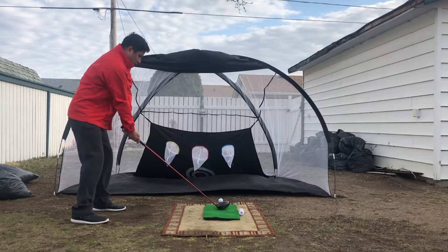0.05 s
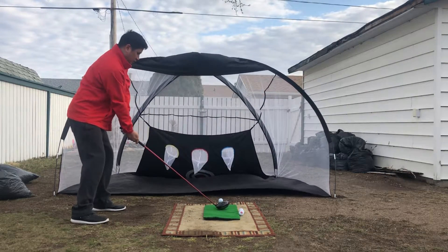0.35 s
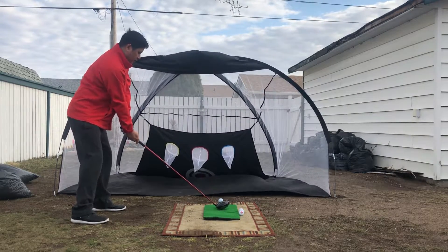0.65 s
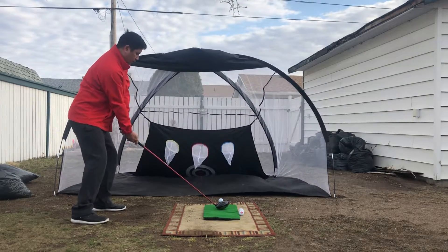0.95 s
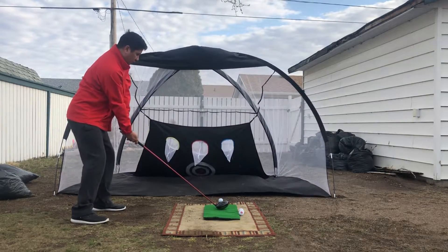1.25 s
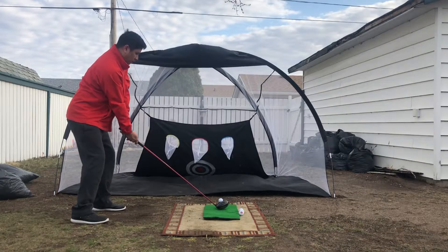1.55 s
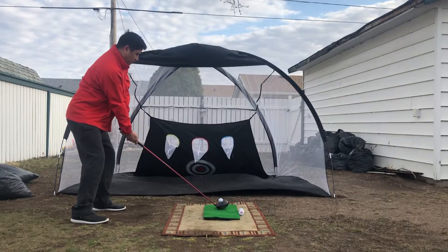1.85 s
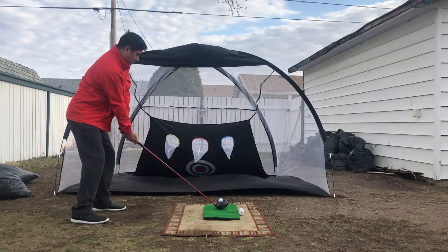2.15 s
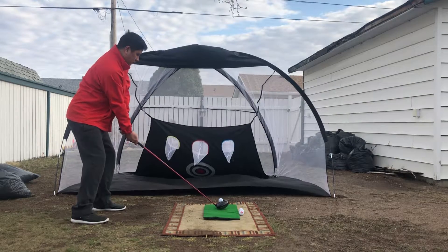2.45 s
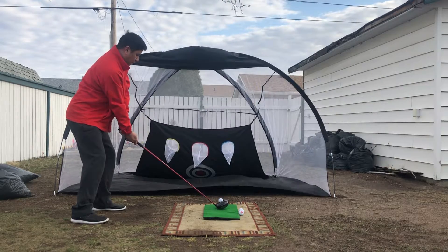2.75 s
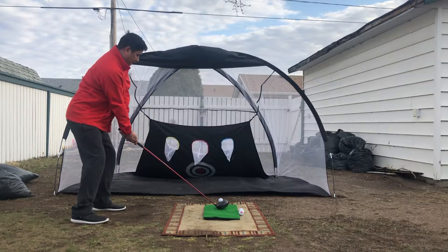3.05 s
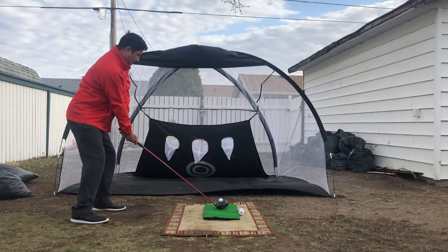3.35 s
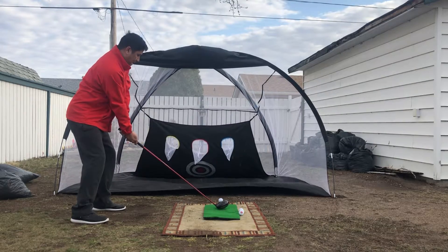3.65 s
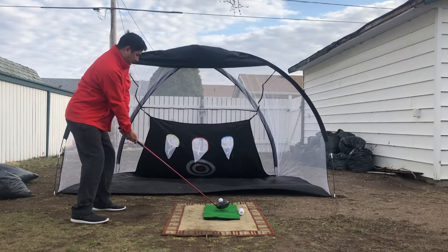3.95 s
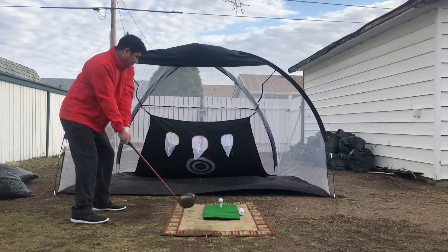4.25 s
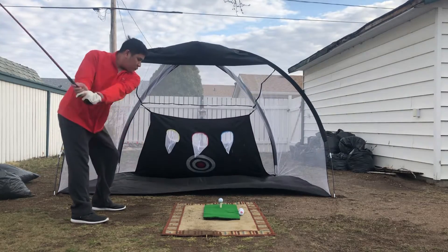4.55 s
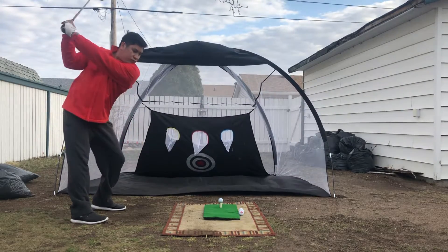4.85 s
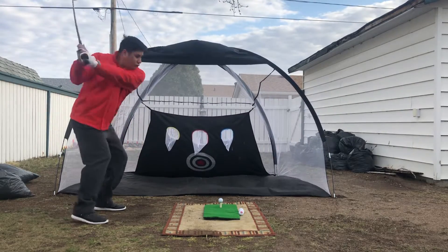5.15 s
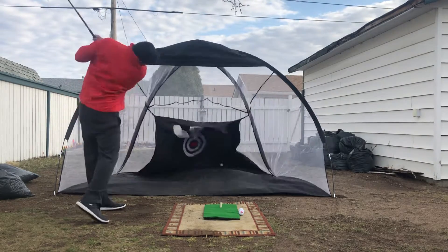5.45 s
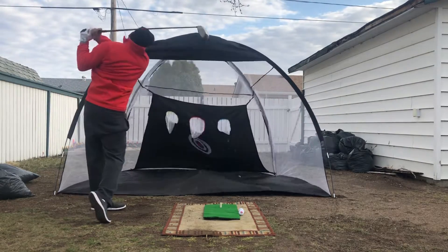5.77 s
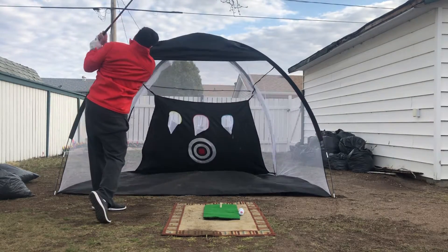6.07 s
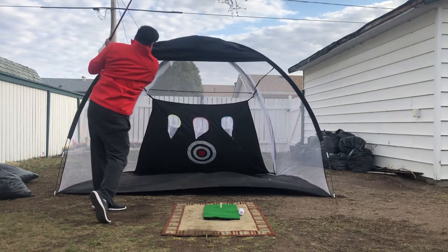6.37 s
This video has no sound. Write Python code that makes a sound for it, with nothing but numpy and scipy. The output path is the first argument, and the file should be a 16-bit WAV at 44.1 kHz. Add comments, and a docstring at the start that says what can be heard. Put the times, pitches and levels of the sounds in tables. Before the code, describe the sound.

Light wind rumbles on the microphone in a quiet backyard, then a golf club swishes and cracks a ball into a flapping practice net.

```python
"""Light wind buffets the microphone in a quiet backyard, over a distant hush and small sounds of a golfer.
He drives a ball into a practice net: the shaft swishes by vortex shedding, the impact cracks and sets
the hollow metal head ringing in its modes, and a fence and a garage reflect the sound. The ball slaps
the target sheet, which flaps and drums while the netting rustles. A limiter ducks under the blows."""
import sys
import numpy as np
from scipy import signal
from scipy.fft import rfft, irfft, next_fast_len
from scipy.io import wavfile
from scipy.ndimage import uniform_filter1d, minimum_filter1d

SR = 44100
rng = np.random.default_rng(int(sys.argv[2]) if len(sys.argv) > 2 else 0)


def log_audio(samples):
    """Write samples as a 16-bit WAV file to the path given in sys.argv[1]."""
    # one column per channel
    frames = np.atleast_2d(samples).T
    # limit to full scale, then quantise
    limited = np.clip(frames, -1, 1)
    pcm = np.round(limited * 32767).astype(np.int16)
    wavfile.write(sys.argv[1], SR, pcm)


N = 291501
TIME = np.arange(N) / SR
STRIKE_S = 5.3721


def from_db(db):
    return 10 ** (np.asarray(db) / 20)


def rms_one(x):
    return x / np.sqrt(np.mean(x ** 2) + 1e-20)


def in_time(rows):
    """Each column of a curve, joined by straight lines."""
    s, *columns = np.transpose(rows)
    return [np.interp(TIME, s, c) for c in columns]


def since(s):
    """Seconds since an event, zero before it."""
    return np.maximum(TIME - s, 0)


def add(out, s, sound):
    """Mix a short sound in at a time."""
    at = max(int(s * SR), 0)
    out[at:at + len(sound)] += sound[:N - at]


def cut(x, hz, kind, order=2):
    """Butterworth low- or high-pass."""
    return signal.sosfilt(signal.butter(order, min(hz, .45 * SR), kind, fs=SR, output="sos"), x)


def drift(rate):
    """Slow chance with spread 1."""
    r = np.exp(-40 * np.pi * rate / SR)
    slow = signal.lfilter([1], [1, -2 * r, r * r], rng.standard_normal(N // 20 + 2002))[2000:]
    return np.interp(np.arange(N) / 20, np.arange(len(slow)), rms_one(slow))


def coloured(spectrum, source=None):
    """Noise (or a given source) with a smooth spectrum and steep ends; rms 1."""
    hz, db = np.transpose(spectrum)
    size = next_fast_len(N)
    f = np.maximum(np.fft.rfftfreq(size, 1 / SR), 1)
    ends = 1 / np.sqrt((1 + (hz[0] / f) ** 8) * (1 + (f / hz[-1]) ** 8))
    source = rng.standard_normal(N) if source is None else source
    return rms_one(irfft(rfft(source, size) * ends * from_db(np.interp(np.log(f), np.log(hz), db)),
                         size)[:N])


def narrow_noise(hz, width_hz):
    """A wavering tone around a pitch, which may move; rms 1."""
    phase = 2 * np.pi * np.cumsum(hz * np.ones(N)) / SR
    return drift(width_hz) * np.cos(phase) + drift(width_hz) * np.sin(phase)


def swells(rows, rest_db):
    """Incoherent addition: bell-shaped swells and a resting level sum in power to give one gain."""
    power = sum((from_db(db) * np.exp(-np.minimum(np.abs(TIME - s) / half, 10) ** 2)) ** 2
                for s, db, half in rows)
    return np.sqrt(power + from_db(rest_db) ** 2)


def burst(s, length_s, order, rise_s=0.00035):
    """Transient envelope: a sharp attack, then a decay that ends more abruptly at higher order."""
    age = since(s)
    return (1 - np.exp(-age / rise_s)) * np.exp(-np.minimum(age / length_s, 4) ** order)


def resonate(x, hz, width_hz):
    """Resonance: a damped oscillator passes a band around its natural frequency; rms 1."""
    r = np.exp(-np.pi * width_hz / SR)
    return rms_one(signal.lfilter([1, 0, -1], [1, -2 * r * np.cos(2 * np.pi * hz / SR), r * r], x))


def grains(spectrum, grain_db):
    """Friction noise: slipping in tiny grains modulates the amplitude at random; rms 1."""
    return coloured(spectrum, rng.standard_normal(N) * from_db(grain_db * drift(440)))


def falling_wave(hz, turns, rise_s, decay_s):
    """Dispersion: a pulse whose highs arrive first and whose lows trail behind."""
    t = np.arange(SR // 6) / SR
    envelope = (1 - np.exp(-t / rise_s)) * np.exp(-t / decay_s)
    return envelope * np.sin(2 * np.pi * turns * np.log1p(t * hz / turns))


# course of the distant hush: (time [s], level [dB])
HUSH_LEVEL = [(0, -50), (1.1, -52.5), (6.6, -52)]
# its spectrum: (frequency [Hz], relative density [dB])
HUSH_SPECTRUM = [(50, 1.5), (90, -2), (170, -2.5), (300, -5), (550, -10.5), (800, -9), (1100, -13.5),
                 (1840, -18.5), (2760, -24.5), (4740, -29), (7000, -34.5), (11000, -41), (19000, -49.5)]
def hush():
    """Ambient noise: a nearly steady outdoor floor, strongest in the bass."""
    level_db, = in_time(HUSH_LEVEL)
    return from_db(level_db) * coloured(HUSH_SPECTRUM)


# whistles of a far bird: (centre time [s], level [dB], pitch [Hz], glide [Hz/s], half length [s])
WHISTLES = [(1.86, -74, 8150, -800, .06), (2.062, -77, 8250, 5000, .035), (2.123, -69, 8560, 1200, 0.038),
            (4.3, -74, 7500, -300, .07)]
def bird(waver_hz=40):
    """Frequency modulation: each faint whistle is a tone that glides and wavers."""
    out, t = np.zeros(N), np.arange(-SR // 5, SR // 5) / SR
    waver = drift(waver_hz)[:len(t)]
    for s, db, hz, glide, half in WHISTLES:
        tone = np.sin(2 * np.pi * (hz + glide * t / 2) * t + waver)
        add(out, s + t[0], from_db(db) * np.exp(-(t / half) ** 2) * tone)
    return out


# rubbing and rasping noise: (frequency [Hz], relative density [dB])
FRICTION_SPECTRUM = [(700, 11), (1800, 12.5), (5000, 2), (7000, -6), (10000, -7), (15000, -14)]
# faint chirps around the yard: (time [s], level [dB], pitch [Hz], length [s])
CHIRPS = [(3.454,-54.5,2780,.011), (3.481,-62,2820,0.064), (3.589,-55.5,2590,0.019), (3.607,-57,2700,0.022),
          (3.727,-61,2670,0.031), (4.089,-61,2690,.012), (4.18,-58.5,2680,0.026), (4.23,-64,2670,0.035)]
def chirps(width_hz=130, rasp_db=-4, rasp_top_hz=6000):
    """Narrow-band noise is heard as a rough pitch; each chirp adds a broad rasp and stops short."""
    rasp = from_db(rasp_db) * cut(coloured(FRICTION_SPECTRUM), rasp_top_hz, "low")
    return sum(from_db(db) * burst(s, length, order=4) * (narrow_noise(hz, width_hz) + rasp)
               for s, db, hz, length in CHIRPS)


# metallic squeaks: (time [s], level [dB], pitch [Hz], length [s], overtone loss [dB/octave])
SQUEAKS = [(0.776,-45.5,2330,0.039,9), (3.59,-50,1062,0.05,6)]
# their overtones: (frequency [multiples of the pitch])
SQUEAK_RATIOS = [2.52, 4.33, 6.52]
def squeaks(waver_rad=0.27, waver_hz=70, friction_db=-12, overtone_db=-5, width_hz=160):
    """Friction-driven vibration: rubbed metal sings with rough, inharmonic overtones and stops dead."""
    out = np.zeros(N)
    waver = waver_rad * drift(waver_hz)
    friction = from_db(friction_db) * coloured(FRICTION_SPECTRUM)
    for s, db, hz, length, loss_db in SQUEAKS:
        tone = np.sin(2 * np.pi * hz * TIME + waver)
        overtones = sum(from_db(overtone_db - loss_db * np.log2(r)) * narrow_noise(r * hz, width_hz)
                        for r in SQUEAK_RATIOS)
        out += from_db(db) * burst(s, length, order=10, rise_s=.004) * (tone + overtones + friction)
    return out


def eddy(t, hz, turn, front_db, lead_cycles=0.98, trail_cycles=1.63, sag=0.4625):
    """Pressure pulse of one eddy: a brief, higher thump, then a cycle or two that sag in pitch."""
    front_hz, lead_s, front_s = 305, 0.0019, 0.0032
    cycles = t * hz
    phase = np.cumsum(hz * 2 ** (-1.5 * np.tanh(sag * cycles))) / SR + turn
    envelope = np.exp(-(cycles / np.where(cycles < 0, lead_cycles, trail_cycles)) ** 2)
    # a complex pulse whose spectrum peaks at front_hz, turned to follow the eddy's phase
    thump = (1 - 1j * (t + lead_s) / front_s) ** (-1 - 2 * np.pi * front_hz * front_s)
    front = np.real(thump * np.exp(2j * np.pi * np.interp(-lead_s, t, phase)))
    return envelope * np.sin(2 * np.pi * phase) + from_db(front_db) * front


# gusts of the breeze: (centre time [s], level [dB], half length [s])
GUSTS = [(.42, -41.5, 0.084), (.65, -47, 0.042), (1.08, -46.5, 0.1), (1.37, -39.5, 0.19), (1.9, -43, 0.21),
         (2.56, -47.5, 0.23), (2.95, -46.5, 0.12), (3.21, -45, 0.067), (3.9, -45.5, 0.16),
         (4.22, -43, 0.14), (4.72, -44.5, 0.29), (5.1, -41, 0.11)]
# their rumble: (frequency [Hz], relative density [dB])
RUMBLE_SPECTRUM = [(35, -7.5), (55, 6.5), (85, -1), (140, -11.5), (220, -8), (320, -29), (500, -41.5),
                   (800, -50.5)]
# the strongest eddies: (time [s], relative level [dB], pitch [Hz], front relative to eddy [dB])
STRONG_EDDIES = [(.413,-31.5,188,-18), (.472,-30,135.8,-24), (1.008,-33,222,-22), (1.035,-29.5,99.8,-13),
                 (1.162,-32.5,150.8,-12), (1.185,-34.5,85,-26), (1.275,-32,144.7,-7), (1.31,-27.5,231,-18),
                 (1.323,-18.5,220.8,-1), (1.335,-22,92.6,-20), (1.353,-19,154.7,-4.5),
                 (1.364,-26.5,190.1,1.5), (1.423,-24,169,-5.5), (1.455,-15,150.1,-6.5),
                 (1.478,-25.5,95.6,-26), (1.698,-29,182,-7), (1.71,-28,72,-26), (1.772,-38,129.7,-15),
                 (1.844,-27.5,115.1,-9), (1.861,-32.5,170.4,-2), (1.872,-30,75.4,-26), (1.903,-36,74.7,-24),
                 (1.928,-27,143,-2.5), (1.991,-31.5,105.2,-16), (2.048,-28.5,135.8,-5), (2.072,-37,70,-26),
                 (2.392,-39,95,-18), (2.437,-37,105.4,-18), (2.503,-34,124.6,-12), (2.597,-36,170.2,-14),
                 (2.618,-31.5,150.4,-6), (2.648,-28.5,125.5,-4), (2.665,-38,75.3,-25),
                 (2.865,-39,159.3,-10), (2.948,-38.5,150,-12), (3.014,-35.5,115,-13),
                 (3.195,-39.5,171.5,-12), (3.216,-30,150.4,-7), (3.866,-33,138.4,-19),
                 (3.908,-37,130.5,-14), (3.971,-19.5,130.1,-14.5), (3.998,-32,89.8,-28),
                 (4.061,-30.5,132.7,-24), (4.078,-35,71.9,-31), (4.165,-36,109.8,-18), (4.2,-26.5,185,-6),
                 (4.212,-30.5,115,-26), (4.233,-28.5,197.4,-1), (4.262,-27.5,115,-21),
                 (4.468,-33,108.8,-27), (4.641,-34,199.9,2.5), (4.653,-25.5,119.3,-17),
                 (4.849,-30,140.4,-25), (4.942,-31,134.7,-20), (5.062,-31.5,177,-19), (5.14,-26,111.9,-7.5),
                 (5.218,-35,120.4,-6)]
def wind(lumpy_db=2.5, eddy_gain_db=-1, eddies_per_s=13, eddy_hz=115.15, spread_octaves=0.494):
    """Turbulent pressure on the microphone: a lumpy rumble, strong eddies and random weaker ones."""
    gusts = swells(GUSTS, rest_db=-62.5)
    out = gusts * rms_one(coloured(RUMBLE_SPECTRUM) * from_db(lumpy_db * drift(23)))
    births = np.flatnonzero(rng.random(N) < eddies_per_s / SR)
    weak_db = 20 * np.log10(gusts) + 5.5 + 2 * rng.uniform(-1, 1, N)   # they ride on the gusts
    weak_hz = eddy_hz * 2 ** (spread_octaves * rng.uniform(-1.001, 1, N))
    weak_eddies = [(TIME[i], weak_db[i], weak_hz[i], -16) for i in births]
    t = np.arange(-SR // 20, SR // 20) / SR
    for (s, db, hz, front_db), turn in zip(STRONG_EDDIES + weak_eddies, rng.random(N)):
        add(out, s + t[0], from_db(db + eddy_gain_db) * eddy(t, hz, turn, front_db))
    return out


def turbulence(rumble, fine_db=-21, low_hz=140, top_hz=480):
    """Energy cascade: strong eddies break up into finer, higher ones."""
    strength = np.sqrt(np.abs(uniform_filter1d(rumble ** 2, size=500)))
    fine = cut(cut(rng.standard_normal(N), top_hz, "low", order=4), low_hz, "high")
    return from_db(fine_db) * strength * rms_one(fine)


# dry ticks of grit and gear: (time [s], relative level [dB], centre frequency [Hz], decay time [s])
TICKS = [(.207, -57, 3500, .005), (1.9005, -48, 4470, 0.0021), (2.9, -52, 4000, 0.0018),
         (5.034, -51, 8000, 0.0035), (6.245, -44, 5500, 0.0015), (6.498, -63, 12000, .002),
         (6.581, -50, 5800, 0.0021)]
def ticks(gain_db=2, width_hz=4500, low_hz=2500):
    """A short transient has a wide band: crisp clicks with no bass."""
    snap = cut(rng.standard_normal(N), low_hz, "high")
    return sum(from_db(db + gain_db) * burst(s, length, order=1) * resonate(snap, hz, width_hz)
               for s, db, hz, length in TICKS)


# scuffs of shoes and clothes: (time [s], relative level [dB], resonance [Hz], length [s])
SCUFFS = [(.09, -61, 4520, .03), (.815, -58.5, 3520, 0.023), (1.274, -62.5, 3940, 0.037),
          (2.893, -57, 3160, 0.015), (3.628, -59, 1780, 0.022), (5.032, -56, 4500, 0.013),
          (5.045, -58.5, 5600, 0.039)]
def scuffs(gain_db=2, body_db=-3, body_width_hz=2200, ring_db=-10, ring_width_hz=160, friction_db=-3):
    """Sliding friction: each brief contact excites a broad and a narrow resonance."""
    out = np.zeros(N)
    friction = grains(FRICTION_SPECTRUM, grain_db=4.5)
    for s, db, hz, length in SCUFFS:
        body = from_db(body_db) * resonate(friction, hz, body_width_hz)
        ring = from_db(ring_db) * resonate(friction, hz, ring_width_hz)
        envelope = from_db(db + gain_db) * burst(s, length, order=2)
        out += envelope * (from_db(friction_db) * friction + body + ring)
    return out


# creaks, perhaps of the glove on the grip: (time [s], level [dB], length [s])
CREAKS = [(2.205, -56, .05), (2.372, -60.5, .05), (5.25, -57, .05)]
# their resonances: (frequency [Hz], relative level [dB])
CREAK_MODES = [(2400, -5), (3950, -5), (5000, -8), (6340, -1), (7900, -8.5), (10700, -13)]
def creaks(ring_db=-2, width_hz=170, friction_db=-6):
    """Forced vibration: rubbing excites the same few narrow resonances each time."""
    friction = coloured(FRICTION_SPECTRUM)
    ringing = sum(from_db(db + ring_db) * resonate(friction, hz, width_hz) for hz, db in CREAK_MODES)
    envelope = sum(from_db(db) * burst(s, length, order=2) for s, db, length in CREAKS)
    return envelope * (ringing + from_db(friction_db) * friction)


# dull brushes as the golfer takes his stance: (centre time [s], level [dB], half length [s])
BRUSHES = [(.13, -57.5, 0.07), (.31, -62, 0.056), (2.87, -61, .05)]
# their spectrum: (frequency [Hz], relative density [dB])
BRUSH_SPECTRUM = [(500, 0.5), (1500, 0), (2400, -2.5), (4000, -8.5), (6500, -12.5)]
# he settles, winds up, swings and follows through: (centre time [s], level [dB], half length [s])
MOVES = [(.18, -64, 0.32), (.68, -61, 0.06), (1.22, -67, 0.41), (1.85, -64, 0.16), (2.4, -66, 0.071),
         (2.9, -63.5, 0.06), (4.7, -64, 0.45), (5.27, -56, 0.076), (5.365, -43, 0.042), (5.76, -56, 0.048),
         (6.235, -58.5, 0.04)]
# rustle of fabric and mesh: (frequency [Hz], relative density [dB])
RUSTLE_SPECTRUM = [(500, 3), (900, -7.5), (1300, -2), (2400, -1), (3500, -7), (5000, -6.5), (9000, -13.5),
                   (13000, -14), (19000, -15)]
def jacket(rest_db=-70):
    """Friction of cloth on cloth: the jacket brushes and rustles as the golfer moves."""
    brushing = swells(BRUSHES, rest_db) * coloured(BRUSH_SPECTRUM)
    return brushing + swells(MOVES, rest_db) * grains(RUSTLE_SPECTRUM, grain_db=2)


def netting(level_db=-46.5, attack_s=.02, hold_s=0.36, release_db_per_s=66):
    """Friction in the mesh: the netting rustles once the ball is in, then settles."""
    attack = 1 - np.exp(-since(SLAP_S) / attack_s)
    release = from_db(level_db - release_db_per_s * since(SLAP_S + hold_s))
    return attack * release * grains(RUSTLE_SPECTRUM, grain_db=2)


# modes of the sheet stretched on its cords: (frequency [Hz], level [dB], 60 dB decay time [s])
SHEET_MODES = [(84, -23, .45), (206, -25.5, 0.88), (251, -29, 0.64), (292, -29.5, 0.76), (337, -34.5, .65),
               (408, -37.5, .55)]
def drumming(rise_s=0.03):
    """Normal modes of a membrane: the sheet's low tones swell after the slap and die away."""
    age = since(SLAP_S)
    modes = sum(from_db(db - 60 * age / t60) * np.sin(2 * np.pi * hz * age)
                for hz, db, t60 in SHEET_MODES)
    return (1 - np.exp(-age / rise_s)) * modes


# the shaking sheet: (frequency [Hz], relative density [dB])
SHAKE_SPECTRUM = [(50, -13), (80, 0), (145, 1), (210, 4), (300, -3), (400, -8), (550, -24.5), (800, -38.5)]
# the ball's slap, then the flaps: (time [s], relative level [dB], starting pitch [Hz], decay time [s])
FLAPS = [(5.405,12.5,2300,0.00044), (5.4066,14.5,497,0.0031), (5.416,4,165,0.0047), (5.431,-2.5,330,0.0078),
         (5.441,-8,131,.008), (5.449,-14,380,.004), (5.4587,2,523,0.0032), (5.47,-10,400,0.004),
         (5.483,-8,453,0.0037), (5.495,-9,433,0.0058), (5.513,-19,610,.003), (5.518,-10,394,0.0044),
         (5.531,-19,310,.005), (5.541,-19,370,0.0055), (5.553,-18,310,0.0059), (5.567,-18,476,0.0022),
         (5.583,-20,248,0.0094), (5.603,-18,340,0.0092), (5.624,-19,360,0.0057), (5.639,-29,330,.005),
         (5.655,-23.5,258,0.01), (5.671,-22,192,.009), (5.69,-27,180,0.0074), (5.707,-26,210,0.0081),
         (5.758,-36,280,.007), (5.782,-37,240.2,.008), (5.812,-38,260,.007), (5.835,-35.5,160,0.0088),
         (5.862,-38,300,0.0079)]
SLAP_S = FLAPS[0][0]
def sheet(attack_s=.008, flutter_db=1.5, snap_db=-7, snap_s=0.003):
    """Dispersive waves: the ball snaps the sheet taut, each flap falls in pitch, and it shakes out."""
    age = since(SLAP_S)
    shake, sway = from_db(-22 - 87.5 * age), from_db(-41 - 29 * age)   # the softer sway lasts longer
    flutter = rms_one(coloured(SHAKE_SPECTRUM) * from_db(flutter_db * drift(30)))
    out = (1 - np.exp(-age / attack_s)) * (shake + sway) * flutter
    for s, db, hz, decay_s in FLAPS:
        flap = falling_wave(hz, turns=1.62, rise_s=0.00075, decay_s=decay_s)
        add(out, s, from_db(db) * cut(flap, 1.2 * hz, "low"))   # soft cloth dulls each flap
    t = np.arange(SR // 50) / SR
    snap = cut(cut(rng.standard_normal(len(t)), 1400, "high"), 13000, "low")
    add(out, SLAP_S, from_db(snap_db) * snap * np.exp(-t / snap_s))
    return cut(out, 42, "high")   # the sheet is too small to push deeper bass


def reverberant_gain(s, level_db, build_s, t60):
    """Reverberation: reflections build up, then decay exponentially."""
    age = since(s)
    return from_db(level_db - 60 * age / t60) * (1 - np.exp(-age / build_s))


# scattered sound of the strike: (frequency [Hz], relative density [dB])
STRIKE_SCATTER = [(300, -19), (500, -8), (700, -17), (1100, -16.5), (2000, -14.5), (2600, -15.5),
                  (3600, -24), (4000, -13), (5500, -14.5), (6800, -5), (8000, -16.5), (10000, -16.5),
                  (12000, -24.5), (18000, -23)]
# later scatter from the yard: (frequency [Hz], relative density [dB])
YARD_SCATTER = [(450, 5.5), (650, -9.5), (850, -10.5), (1340, -9.5), (1800, -12.5), (2300, -14),
                (3400, -19.5), (4100, -15.5), (5500, -21.5), (7300, -18.5), (10000, -26), (12500, -29.5),
                (18000, -37.5)]
def scatter():
    """Diffuse reflection: countless small returns from siding, fence and ground merge into noise."""
    near = reverberant_gain(STRIKE_S, level_db=-7.5, build_s=0.051, t60=0.19) * coloured(STRIKE_SCATTER)
    far = reverberant_gain(5.419, level_db=-18, build_s=0.004, t60=0.36) * coloured(YARD_SCATTER)
    return near + far


# air shed by the shaft on the downswing: (time [s], pitch [Hz], relative level [dB])
SWISH = [(5.24, 395.7, -61), (5.295, 492.5, -42.5), (5.315, 606, -36.5), (5.35, 725, -33.5),
         (5.37, 827, -33), (5.40, 715, -55.5), (5.45, 497, -70.5)]
def swish(width_hz=160, gain_db=-4, head_ratio=0.35, head_db=-3):
    """Vortex shedding: the pitch rises with the shaft's speed; the thick head sheds a lower one."""
    hz, level_db = in_time(SWISH)
    passing = (TIME > SWISH[0][0]) & (TIME < SWISH[-1][0])
    vortices = narrow_noise(hz, width_hz) + from_db(head_db) * narrow_noise(head_ratio * hz, width_hz)
    return passing * from_db(level_db + gain_db) * vortices


# modes of the hollow club head: (frequency [Hz], relative level [dB], 60 dB decay time [s])
HEAD_MODES = [(3930,-30,.2), (4090,-32.5,.3), (4341,-25,0.22), (4420,-29,.16), (5019,-29,.2),
              (5310,-30.5,.14), (5950,-21.5,0.13), (6080,-21,0.16), (6530,-22,.13), (6600,-21,0.16),
              (6780,-18.5,0.2), (6914,-26,.14), (7060,-5,.012), (7480,-16,.2), (7500,-24,.14),
              (7800,-23.5,.2), (7940,-25,.15), (8325,-26.5,.12), (8430,-27.5,.14), (8700,-23.5,.14),
              (9078,-23,.11), (9510,-26.5,.16), (10000,-26.5,.12), (10520,0,.0075), (10753,-26,.12),
              (11041,-29,.11), (11970,-30,0.098), (13294,-23.5,.07), (14200,-31,.07), (15450,-30,.09)]
def head_ring(doppler, swerve_per_s=0.01):
    """Doppler effect: the head's decaying modes slide in pitch as it swings on through its arc."""
    t = np.arange(SR // 4) / SR
    warped_time = t * (1 + doppler - swerve_per_s * t)
    return sum((-1) ** k * from_db(db - 60 * t / t60) * np.sin(2 * np.pi * hz * warped_time)
               for k, (hz, db, t60) in enumerate(HEAD_MODES))


def ringing_tail():
    """Reverberation at random phase: the head's ping lingers among the walls."""
    ping = rms_one(signal.fftconvolve(rng.standard_normal(N), head_ring(doppler=-0.0036))[:N])
    return reverberant_gain(STRIKE_S, level_db=-27, build_s=.02, t60=0.17) * ping


# echoes off hard surfaces, each facing the moving head from another side:
# (delay [s], relative level [dB], Doppler shift [fraction of the pitch])
ECHOES = [(.0031,-8,0.0088), (0.0097,-12,-.006), (0.014,-9.5,-0.002), (0.0218,-11.5,-0.014),
          (.0245,-7.5,.006), (.028,-11,-.002)]
def club(click_db=1, knock_db=-17, crack_db=-10, crack_s=0.0044, ring_db=-3.5, echo_db=-2):
    """Impulse excitation: the brief contact clicks, knocks, cracks and rings the head; the walls echo."""
    t = np.arange(SR // 40) / SR
    click = from_db(click_db) * falling_wave(hz=3300, turns=1.8, rise_s=.00005, decay_s=0.0016)
    knock = from_db(knock_db) * falling_wave(hz=520, turns=1.8, rise_s=.0003, decay_s=0.0029)
    crack = from_db(crack_db) * cut(rng.standard_normal(len(t)), 4200, "high") * np.exp(-t / crack_s)
    out = np.zeros(N)
    for sound in (click, knock, crack, from_db(ring_db) * head_ring(doppler=0)):
        add(out, STRIKE_S, sound)
    for delay, db, doppler in ECHOES:
        for sound in (from_db(-18.5) * click, from_db(-6) * crack, from_db(ring_db) * head_ring(doppler)):
            add(out, STRIKE_S + delay, from_db(db + echo_db) * sound)
    return out


def scene():
    """Superposition: yard, wind, golfer, net and shot sum in one channel."""
    yard = hush() + bird() + chirps() + squeaks()
    rumble = wind()
    golfer = ticks() + scuffs() + creaks() + jacket()
    net = netting() + drumming() + sheet()
    shot = scatter() + swish() + ringing_tail() + club()
    return (yard + rumble + turbulence(rumble) + golfer + net + shot)[None]


def record(dry, ceiling_db=-1.96, release_db_per_s=450, bottom_hz=25, top_hz=16100):
    """Peak and band limiting: the gain ducks under the loudest peaks; deep bass and the top are cut."""
    dry = cut(dry, bottom_hz, "high", order=4)
    over_db = np.maximum(20 * np.log10(np.abs(dry[0]) + 1e-9) - ceiling_db, 0)
    held_db = np.maximum.accumulate(over_db + release_db_per_s * TIME) - release_db_per_s * TIME
    gain_db = uniform_filter1d(minimum_filter1d(-held_db, size=21), size=21)
    low_pass = signal.ellip(10, .1, 80, top_hz, fs=SR, output="sos")
    return signal.sosfilt(low_pass, dry * from_db(gain_db))


dry = scene()
out = record(dry)
log_audio(out)
```